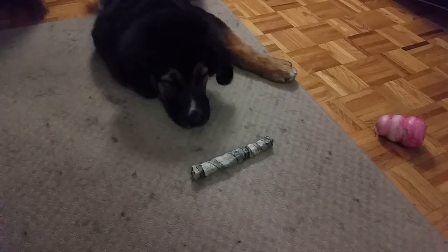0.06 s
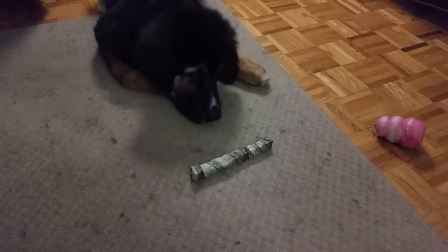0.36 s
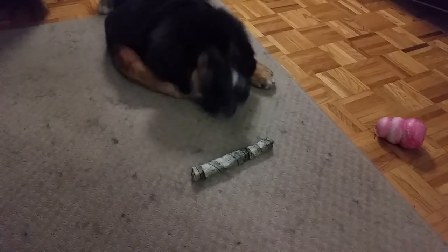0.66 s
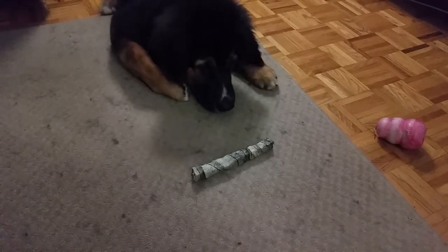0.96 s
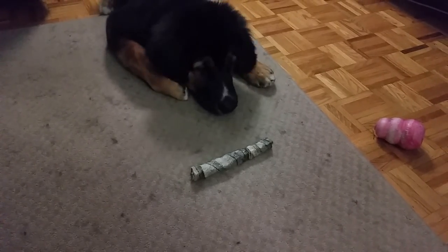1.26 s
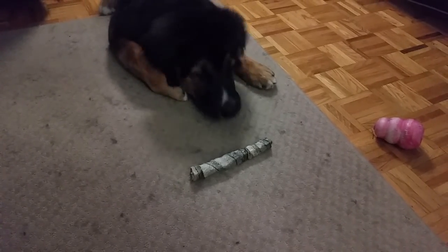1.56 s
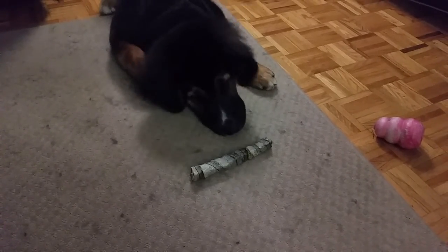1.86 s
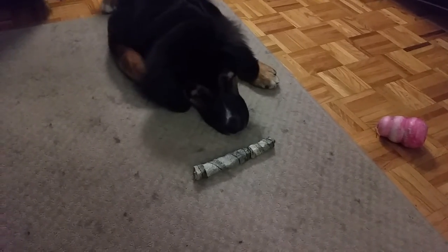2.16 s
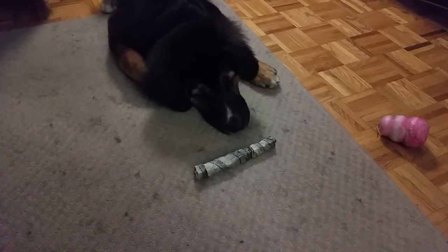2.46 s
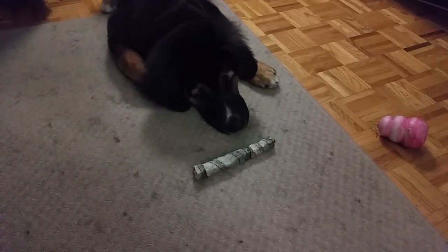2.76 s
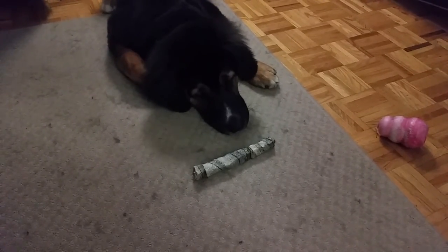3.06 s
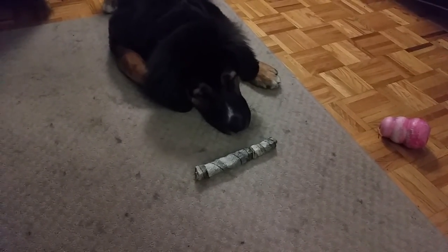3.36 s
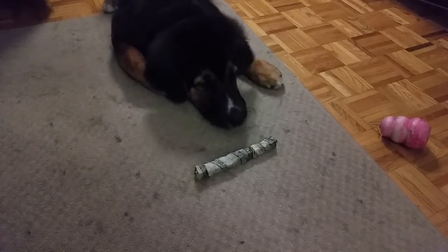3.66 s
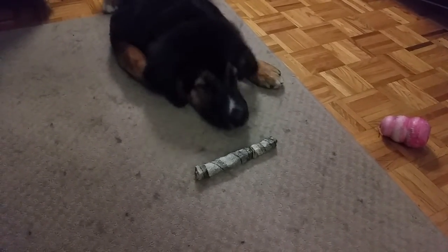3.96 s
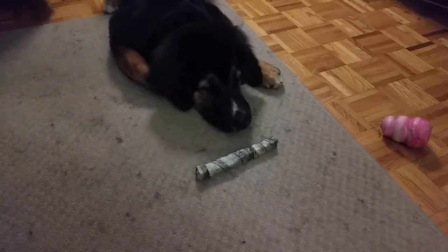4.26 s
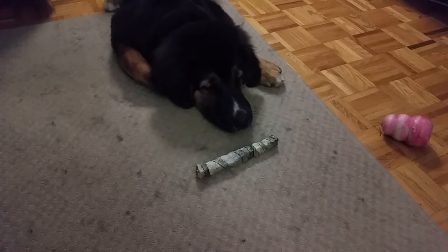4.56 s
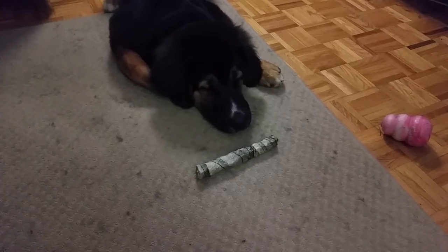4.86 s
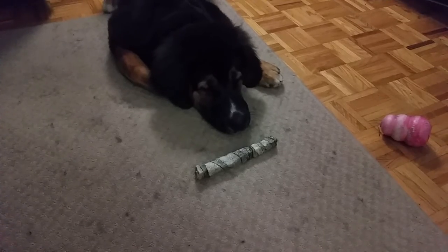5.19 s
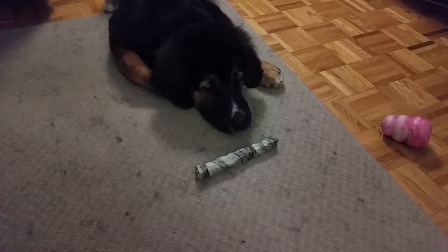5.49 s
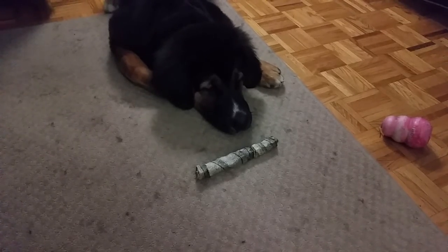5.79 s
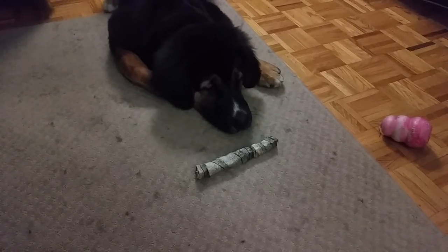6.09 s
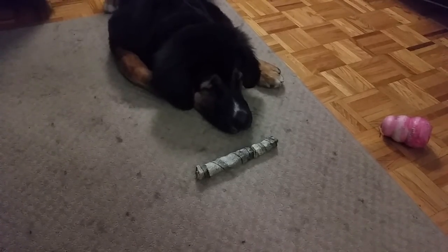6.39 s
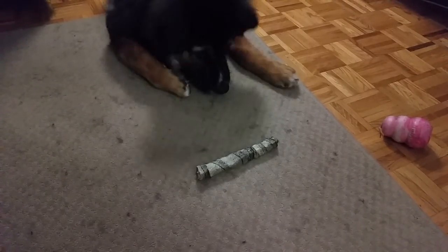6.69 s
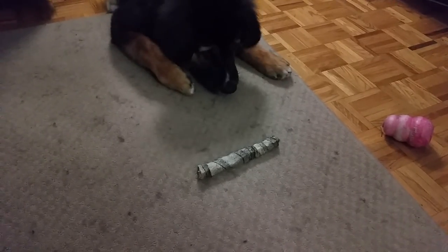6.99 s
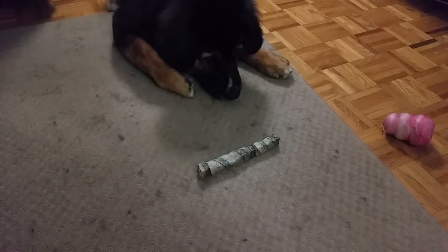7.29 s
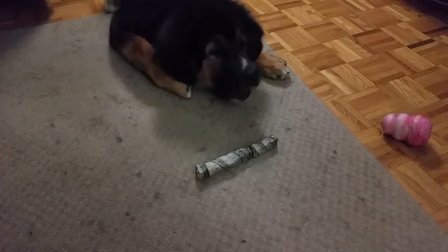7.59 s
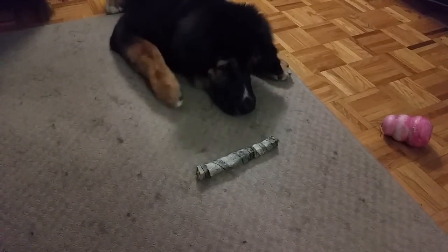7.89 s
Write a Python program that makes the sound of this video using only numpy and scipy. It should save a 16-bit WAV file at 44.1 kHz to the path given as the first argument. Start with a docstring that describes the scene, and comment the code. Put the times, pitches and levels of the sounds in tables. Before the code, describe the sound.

A large dog is close by in a living room, slightly to the right, over faint low room noise. Its fur brushes the carpet at the start, and it grunts at 0.5 seconds. Two short, deep, rough woofs follow at about 0.8 and 1.5 seconds, the second ending in a brief growl. Around 3.3 seconds a soft grunt and a slow, flapping growl lead into two quick woofs at 3.6 and 4 seconds, then a longer low growl trails off by 4.8. After a lull with one faint paw thump, the dog shifts from about 6.6 to 7.2 seconds: paws land with dull thumps, fur brushes the carpet and claws click on the wooden floor. A fifth woof comes at 7.7 seconds. The room rings briefly with each woof, and the background noise dips for about a second afterwards.

```python
"""A big young dog lies close by on a living-room carpet, his fur brushing it over low room noise. He grunts,
gives two short, deep woofs, each one push of the lungs through rough vocal folds, and growls. Another grunt and
a slack, flapping growl lead into two more woofs and a longer growl that trails off. He shifts his paws, clicks
his claws on the parquet and gives a fifth woof. The room rings briefly, and the low background noise sinks for
about a second after each woof."""
import sys
import numpy as np
from scipy import signal
from scipy.fft import rfft, irfft, next_fast_len
from scipy.io import wavfile
from scipy.ndimage import uniform_filter1d, minimum_filter1d

SR = 44100
rng = np.random.default_rng(int(sys.argv[2]) if len(sys.argv) > 2 else 0)


def waveform_to_disk(signal):
    """Save audio, clipped to [-1, 1], as 16-bit WAV at the path in sys.argv[1]."""
    frames = np.transpose(np.atleast_2d(signal))
    scaled = np.clip(frames, -1, 1) * 32767
    samples = np.round(scaled).astype(np.int16)
    wavfile.write(sys.argv[1], SR, samples)


N = 358876

# the woofs: start_s, top_s, end_s, rise_s, fall_s, top_hz, chest_db, throat_db, swell_db, burst_db,
# hiss_db, ring_db, formant_factor, closing_per_s, attack_s, bite_db, roughness_factor
WOOFS = [(.724, .822, .93, .080, .037, 425.8, -18, -20.5, -0.5, 10.5, -43.5, 13.5, 1.022, .65, 0.0086, -30, 1.02),
         (1.45, 1.540, 1.72, .074, .043, 414, -23.5, -25, -2, 0.5, -47, 17, 1.018, .7, 0.011, -37.5, 1),
         (3.539, 3.648, 3.84, .065, .044, 441, -19, -23, 6.5, 9.5, -39, 14.5, 1.083, 1.06, .025, -32, 0.86),
         (3.871, 3.981, 4.2, .069, .051, 426.6, -22.5, -22.5, 3, 0.5, -50, 19, 0.95, 1.2, .01, -35.5, 0.98),
         (7.633, 7.727, 7.84, .075, .045, 417, -21.5, -22.5, -1.5, 9, -43, 12.5, 1.03, .68, .008, -35.5, .85)]
# the dog's dark body tone in grunts and growls: frequency_hz, level_db
GROWL_TONE = [(30, -38.5), (60, -5), (115, 5), (210, 1), (320, -15), (500, -9), (650, -16.5), (830, -32.5),
              (1550, -44), (1820, -25.5), (2200, -44.5), (3900, -51), (4600, -44), (6000, -68)]


def gain_of(db):
    """Decibels to gain."""
    return 10 ** (np.asarray(db) / 20)


def unit_rms(x):
    """Scales to rms 1."""
    return x / np.sqrt(np.mean(x ** 2) + 1e-20)


def curve_at(points, hz):
    """Reads a curve on a log-frequency axis."""
    f, value = np.transpose(points)
    return np.interp(np.log(hz + 1), np.log(f + 1), value)


def add(mix, start_s, sound):
    """Mixes a sound in at start_s."""
    part = mix[max(round(start_s * SR), 0):][:len(sound)]
    part += sound[:len(part)]


def wander(count, hz):
    """Smooth random motion of rms near 1, up to about hz."""
    f = np.fft.rfftfreq(SR, 1 / SR)
    return unit_rms(irfft(rfft(rng.standard_normal(SR)) * np.exp(-(f / hz) ** 2)))[:count]


def colour(x, tone, size=4096):
    """Minimum-phase EQ of unit energy with the given spectrum."""
    log_gain = np.log(gain_of(curve_at(tone, abs(np.fft.fftfreq(size, 1 / SR)))))
    taps = np.fft.ifft(np.exp(np.conj(signal.hilbert(log_gain)))).real[:size // 2]
    return signal.oaconvolve(x, taps / np.linalg.norm(taps))[:len(x)]


def resonate(x, hz, width_hz):
    """One resonance of gain 1 at hz."""
    carrier = np.exp(2j * np.pi * np.cumsum(np.full(len(x), hz)) / SR)
    pole = np.exp(-np.pi * width_hz / SR)
    return 2 * (carrier * signal.lfilter([1 - pole], [1, -pole], x / carrier + 1e-18)).real


def knocks(hits, tone, grit, grit_s):
    """Single impulses, each trailing a little noise, through one body."""
    out, t = np.zeros(N), np.arange(SR // 10) / SR
    for start_s, db in hits:
        trail = grit * np.exp(-t / grit_s) * rng.standard_normal(len(t))
        add(out, start_s, gain_of(db) * ((t == 0) + trail))
    return colour(out, tone)


def room_tone(level_db=-52.5, hum_db=-9, hiss_db=-93, duck_db=-15, sink_s=.15, stay_s=.97, return_s=.5):
    """Low room noise and wavering mains hum, ducking after each woof, over faint steady hiss."""
    # the room's rumble: frequency_hz, level_db
    rumble_tone = [(12, -37), (20, -12.5), (54, 1.5), (118, -4.5), (151, -18), (242, -15), (337, -26),
                   (774, -30), (841, -31), (2930, -53.5), (3550, -36.5), (5090, -63), (8380, -53),
                   (10200, -75), (15000, -47)]
    shared, left, right = (colour(rng.standard_normal(N), rumble_tone) for _ in range(3))
    hum = sum(unit_rms(resonate(rng.standard_normal(N), hz, width_hz=3.3)) for hz in (60, 120))
    bed = unit_rms(shared + np.array([left, right]) + gain_of(hum_db) * hum)
    since_woof = np.arange(N) / SR - np.array(WOOFS)[:, 1:2]
    duck = np.clip(np.minimum(since_woof / sink_s, np.exp((stay_s - since_woof) / return_s)), 0, 1)
    bed *= gain_of(level_db + duck_db * duck.max(0)) * gain_of([[-1.5], [1.5]])  # leans right
    return bed + gain_of(hiss_db) * rng.standard_normal((2, N))


def brushing(attack_s=.054, fade_db=-25):
    """Fur and paws brush the carpet in soft strokes that start quickly and trail off."""
    # the strokes: start_s, fade_s, level_db
    strokes = [(0, 0.055, -54.5), (0.06, 0.39, -68), (0.343, 0.68, -67), (6.071, 0.16, -74.5),
               (6.59, 0.21, -56), (6.76, 0.95, -66)]
    # fur on carpet: frequency_hz, level_db
    fur_tone = [(1000, -1), (3500, -6), (4700, -6.5), (6200, -14.5), (8300, -3), (10500, -20.5),
                (15000, -8.5)]
    envelope, t = np.zeros(N), np.arange(SR) / SR
    for start_s, fade_s, db in strokes:
        add(envelope, start_s, np.minimum(t / attack_s, 1) * gain_of(db + fade_db * t / fade_s))
    return colour(rng.standard_normal(N), fur_tone) * envelope


def grunts():
    """Single low pulses of the voice through the dog's body."""
    # the pulses: start_s, level_db
    pulses = [(.483, -14), (.513, -0.5), (.539, -16), (3.252, -17.5)]
    return knocks(pulses, GROWL_TONE, grit=.02, grit_s=.028)


def mouth_filter(x, tone, stretch, ring_hz=1, ring_db=0, size=512):
    """Formants that the moving mouth stretches, plus one gliding ring; the level is held even."""
    framing = dict(nperseg=size, noverlap=size - size // 8)
    hz, frame_s, spectra = signal.stft(x, SR, **framing)
    stretch, ring_hz = (np.interp(frame_s * SR, np.arange(len(x)), curve * np.ones(len(x)))
                        for curve in (stretch, ring_hz))
    ring = ring_db * np.exp(-((hz[:, None] / ring_hz - 1) / .1) ** 2)
    formants = gain_of(curve_at(tone, hz[:, None] / stretch) + ring)
    voiced = signal.istft(spectra * formants, SR, **framing)[1][:len(x)]
    return voiced / np.sqrt(abs(uniform_filter1d(voiced ** 2, size=500)) + 1e-18)


def vocal_folds(hz, rough, wobble_depth=.055, jitter=.083, shimmer=.41, harmonics=30):
    """Unsteady folds: gives the round chest tone, the raspy buzz, the air puffs and the wobble."""
    # chest resonances: frequency_hz, level_db
    chest_tone = [(60, -7), (120, 1.5), (220, -5), (310, -7), (430, 6), (560, -6.5), (750, -26),
                  (1100, -64)]
    n = len(hz)
    wobble = rough * wander(n, 55)
    cycles = np.cumsum(hz * (1 + wobble_depth * wobble + jitter * rough * wander(n, 170))) / SR
    k = np.arange(1, harmonics + 1)[:, None]
    partials = np.cos(2 * np.pi * k * cycles - k ** 2 / 2)  # lagging overtones round off each pulse
    chest = np.sqrt(2) * (gain_of(curve_at(chest_tone, k * hz)) * partials).sum(0)
    chest *= 1 + shimmer * rough * wander(n, 97)
    # strong and weak cycles alternate unevenly, and each opening lets out a puff of noise
    stagger = 1 + rough * (1.4 * np.cos(np.pi * cycles) + 2 * wander(n, 180))
    pulses = unit_rms(partials.sum(0) * np.sqrt(hz) * stagger)
    puffs = unit_rms((.12 + np.exp(-(cycles % 1) / .3)) * rng.standard_normal(n))
    buzz = (1 - rough) * pulses + 1.1 * rough * puffs
    return chest, buzz, puffs, wobble


def woof(start_s, top_s, end_s, rise_s, fall_s, top_hz, chest_db, throat_db, swell_db, burst_db,
         hiss_db, ring_db, formant_factor, closing_per_s, attack_s, bite_db, roughness_factor,
         slack_hz=79.2, slack_chest_db=-31.5, slack_throat_db=-37, wobble_db=4, break_up_s=.03,
         gape_s=.0091, open_hz=1850, shut_hz=1270, burst_s=.025, bite_s=.015, bite_lead_s=.003,
         hiss_rise_s=.024, release_s=.038):
    """One arch of lung pressure lifts pitch and level: chest tone, rough throat, bite and breath."""
    # throat formants: frequency_hz, level_db
    throat_tone = [(380, -33.5), (560, -9.5), (700, 13), (830, 12), (950, -1), (1110, -8), (1350, -10),
                   (1680, -18), (2000, -30), (2350, -31.5), (2700, -45.5), (3000, -40), (3500, -64.5)]
    # the front of the open mouth: frequency_hz, level_db
    bite_tone = [(900, -38), (1400, -5), (1780, 7.5), (2100, -10.5), (2350, -0.5), (2750, -18.5),
                 (3600, -34.5), (7000, -59.5)]
    # rushing breath: frequency_hz, level_db
    hiss_tone = [(1500, -40.5), (2900, -4.5), (3600, -25.5), (4200, -7.5), (4800, 6.5), (5700, -2.5),
                 (6700, -20), (7700, -0.5), (8400, -14.5), (9200, -5), (11000, -34.5), (13500, -20.5),
                 (16000, -22.5)]
    t = np.arange(start_s, end_s, 1 / SR)
    n, past_top = len(t), t - top_s
    pressure = 1 / (1 + np.where(past_top < 0, abs(past_top / rise_s) ** 4.4,
                                 abs(past_top / fall_s) ** 2.25))
    hz = slack_hz + (top_hz - slack_hz) * pressure
    slack = np.exp(-pressure / .25)  # at low pressure the voice fades, the overtones most
    # the folds beat cleanly on the way up and break up on the way down
    rough = np.clip(roughness_factor * (.2 + .38 / (1 + np.exp(-past_top / break_up_s))), 0, 1)
    chest, buzz, puffs, wobble = vocal_folds(hz, rough)
    # the jaw is widest halfway up the rise; as it shuts the formants sink and the ring falls in a "wow"
    past_gape = past_top + rise_s
    closure = closing_per_s * np.clip(past_gape, -.015, .15)
    stretch = formant_factor * (1 + .1 * np.exp(-(past_gape / gape_s) ** 2)) * np.exp(-closure)
    ring_hz = shut_hz + (open_hz - shut_hz) * np.exp(-25 * closure)
    throat = mouth_filter(buzz, throat_tone, stretch, ring_hz, ring_db)
    bite = mouth_filter(buzz, bite_tone, stretch=.96)
    # a brief jump in loudness at the start of the woof
    punch_db = burst_db * np.exp(-((t - start_s - attack_s) / burst_s) ** 2)
    voice = gain_of(chest_db + slack_chest_db * slack + punch_db + wobble_db * wobble) * chest
    voice += gain_of(throat_db + slack_throat_db * slack + swell_db * pressure ** 2 + punch_db) * throat
    voice += gain_of(bite_db) * np.exp(-((past_gape + bite_lead_s) / bite_s) ** 2) * bite
    # pressure drives the airflow too, so the hiss comes in late and peaks at the top of the arch
    airflow = (hz / top_hz) ** 2.2 * np.minimum((t - start_s) / hiss_rise_s, 1) ** 3
    hiss = mouth_filter(puffs, hiss_tone, np.sqrt(stretch) * (1 + .055 * wander(n, 25)))
    hiss *= gain_of(hiss_db + 2.8 * wander(n, 60)) * airflow
    envelope = np.clip(np.minimum((t - start_s) / attack_s, (end_s - t) / release_s), 0, 1)
    return (voice + hiss) * envelope


def growls(unevenness=.18, flutter_hz=100, rasp=.063, snap=.26, release_s=.03):
    """Slack folds flap slowly; as they grow unsteady a weaker flutter fills in between the flaps."""
    # the growls, each gliding from first to last value: start_s, end_s, first_db, last_db,
    # first_flap_hz, last_flap_hz, first_unsteady (0-1), last_unsteady (0-1)
    phrases = [(1.63, 1.845, -43, -44.5, 38, 41.77, .7, .75),
               (3.322, 3.557, -38, -32, 25.32, 40.3, .06, 0.8),
               (4.088, 4.838, -42, -54.5, 52.2, 32.6, 0.79, .8)]
    out = np.zeros(N)
    soft = signal.windows.hann(SR // 700)  # heavy folds close softly
    for start_s, end_s, first_db, last_db, first_hz, last_hz, first_unsteady, last_unsteady in phrases:
        t = np.arange(start_s, end_s, 1 / SR)
        n = len(t)
        unsteady = first_unsteady + (last_unsteady - first_unsteady) * np.linspace(0, 1, n) ** 4
        pace = 1 + unevenness * unsteady * wander(n, 33)
        flaps, flutter = (np.diff(np.floor(np.cumsum(hz * pace) / SR), prepend=-1)
                          for hz in (np.linspace(first_hz, last_hz, n), flutter_hz))
        pulses = flaps * gain_of(2 * unsteady * wander(n, 40)) + .7 * unsteady * flutter
        drive = np.convolve(unit_rms(pulses), soft / soft.sum(), "same")
        drive += snap * unit_rms(flaps) + rasp * rng.standard_normal(n)
        drive *= gain_of(np.linspace(first_db, last_db, n)) * np.minimum((end_s - t) / release_s, 1)
        add(out, start_s, colour(np.pad(drive, (0, SR // 20)), GROWL_TONE))
    return out


def lips_and_claws(grit_db=5.6):
    """Lips parting and claws on the parquet: gritty clicks that die at once."""
    # clicks and scrapes: start_s, level_db, decay_s
    clicks = [(3.336, -35, 0.011), (6.615, -76, .02), (6.739, -35, 0.011), (6.857, -19.5, 0.0065),
              (7.138, -15, 0.0031), (7.161, -22.5, 0.0096)]
    # their hard, bright tone: frequency_hz, level_db
    click_tone = [(100, -20), (400, 6.5), (1100, 7.5), (2300, 3), (3300, 4.5), (4600, -0.5), (7500, -1.5),
                  (10000, -19), (16000, -21.5)]
    out, t = np.zeros(N), np.arange(SR // 5) / SR
    for start_s, db, decay_s in clicks:
        scrape = rng.standard_normal(len(t)) * np.exp(-t / decay_s)
        scrape *= gain_of(grit_db * wander(len(t), 380))
        add(out, start_s, gain_of(db) * scrape / np.linalg.norm(scrape))
    return colour(out, click_tone)


def paws():
    """Paws set down on the floor with dull thumps."""
    # the landings: start_s, level_db
    landings = [(5.351, -26), (6.571, -18), (6.587, -14.5), (6.605, -10), (6.629, -5.5), (6.921, -10),
                (6.934, -11.5)]
    # the floor under a paw: frequency_hz, level_db
    thump_tone = [(30, -59), (70, -3), (125, 4), (230, -3), (320, -12.5), (520, -19), (900, -41),
                  (2500, -70), (9000, -54)]
    return knocks(landings, thump_tone, grit=.018, grit_s=.033)


def room(x, wet_db, standing_db=0, spacing_s=.0015, predelay_s=.0036, echoes=900):
    """Direct sound, a few standing waves, and a short tail that both microphones share in the bass."""
    # reverb time: frequency_hz, t60_s
    decay_times = [(80, .5), (200, 0.12), (420, 0.41), (800, .36), (2500, .4), (6000, 0.29), (15000, 0.2)]
    # standing waves: pitch_hz, t60_s, level_db
    room_modes = [(81, .7, -9), (122, .4, -15), (404, .3, -4), (421, .3, -4), (778, .33, -11)]
    taps = np.zeros((2, SR // 2))
    arrivals = round(predelay_s * SR) + 20 * np.arange(echoes) + rng.integers(0, 20, (2, echoes))
    np.put_along_axis(taps, arrivals, rng.choice([-1., 1.], arrivals.shape), 1)
    hz, t, spectra = signal.stft(taps, SR, nperseg=256)
    coherence = np.sinc(2 * hz * spacing_s)[:, None]
    spectra[0] = coherence * spectra[1] + np.sqrt(1 - coherence ** 2) * spectra[0]
    decay = gain_of(-60 * t / curve_at(decay_times, hz)[:, None])
    tail = signal.istft(spectra * decay, SR, nperseg=256)[1]
    wet = signal.fftconvolve(x[None], tail / np.linalg.norm(tail[1]), axes=1)[:, :N]
    standing = sum(gain_of(db) * resonate(x, f, np.log(1000) / np.pi / t60) for f, t60, db in room_modes)
    return x + gain_of(standing_db) * standing + gain_of(wet_db) * wet


def microphones(pair):
    """The left microphone faces away from the dog and hears him later and duller than the right."""
    # shading of the left side: frequency_hz, left_minus_right_db
    shadow = [(60, 0.5), (200, 1.5), (380, -8), (700, -6), (1290, -16.5), (2400, -13), (4400, -13.5),
              (8100, -26), (10500, -6.5), (13000, 2), (16000, 4.5)]
    # phase lag of the left side: frequency_hz, lag_radians
    lag = [(50, 0.011), (130, 0.11), (420, 0.19), (780, 0.74), (1640, 0.082), (2300, 1.5), (9000, 0.7)]
    size = next_fast_len(N + SR // 10)
    hz = np.fft.rfftfreq(size, 1 / SR)
    left = gain_of(curve_at(shadow, hz)) * np.exp(-1j * curve_at(lag, hz))
    response = np.array([left, np.ones(len(hz))]) * 2 / abs(1 + left)
    return irfft(rfft(pair, size) * response, size)[:, :N]


def scene():
    """The dog's voice and movements in the room, over the room tone."""
    woofs = np.zeros(N)
    for row in WOOFS:
        add(woofs, row[0], woof(*row))
    lows = growls() + grunts() + paws()
    dog = room(woofs, wet_db=-7, standing_db=4.5) + room(lows, wet_db=-2)
    dog += room(lips_and_claws() + brushing(), wet_db=.5)
    return microphones(dog) + room_tone()


def record(dry, ceiling=.8, cutoff_hz=15800):
    """A limiter holds the peaks of the woofs; a steep low-pass trims the top."""
    peak_gain = np.minimum(1, ceiling / (abs(dry).max(0) + 1e-9))
    limited = dry * uniform_filter1d(minimum_filter1d(peak_gain, size=500), size=400)
    taps = signal.firwin(511, cutoff_hz, window=("kaiser", 9), fs=SR)
    return signal.oaconvolve(limited, taps[None], "same")


dry = scene()
out = record(dry)
waveform_to_disk(out)
```